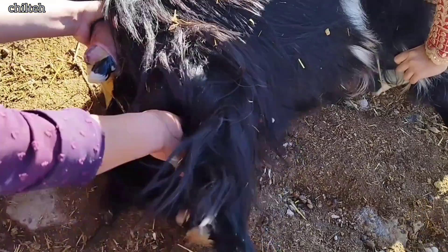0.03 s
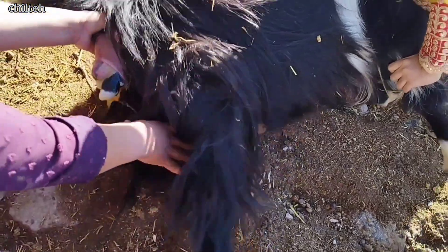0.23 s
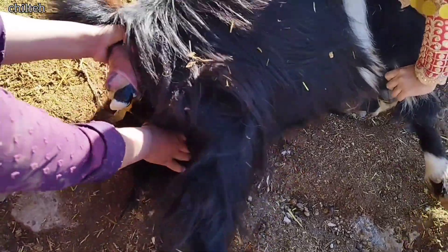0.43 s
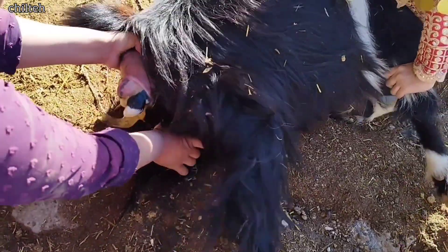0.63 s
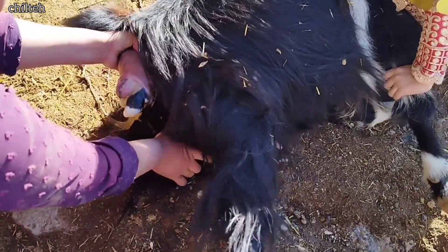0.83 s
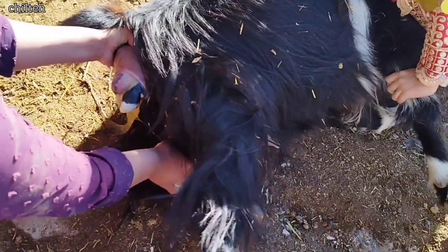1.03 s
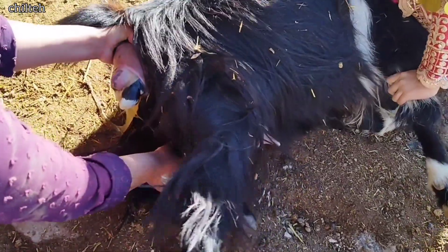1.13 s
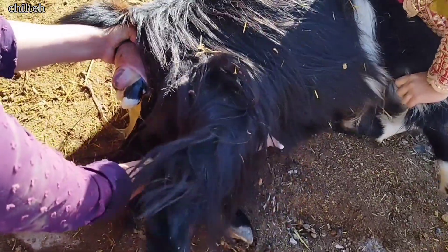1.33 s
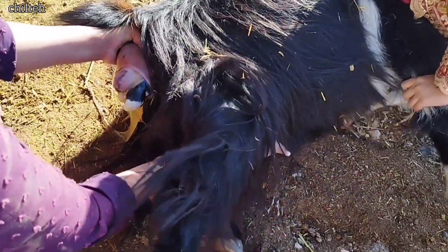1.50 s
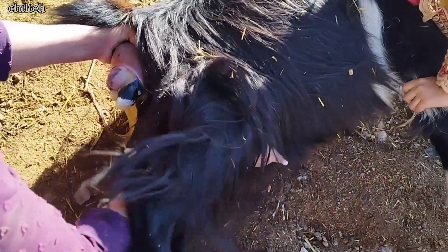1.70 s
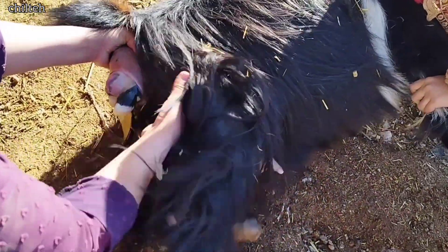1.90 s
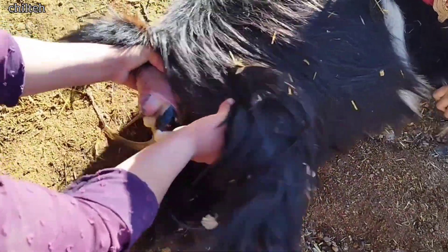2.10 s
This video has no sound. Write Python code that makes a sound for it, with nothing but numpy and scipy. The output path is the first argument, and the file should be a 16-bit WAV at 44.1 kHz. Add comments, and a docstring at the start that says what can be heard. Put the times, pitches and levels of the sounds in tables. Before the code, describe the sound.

A goat groans with its mouth shut, then gives one loud, harsh bleat close by. It trails off in a thin whine and a faint wheeze, while hands softly bump and brush its coat over a low farmyard rumble.

```python
"""Over a low farmyard rumble, hands bump and brush the coat of a goat that is being held down.
It hums, then groans with its mouth shut, which muffles the slow, ragged pulses of its vocal folds.
The jaw opens into one loud, harsh bleat: faster pulses excite the mouth resonance and a ringing rasp.
The bleat trails off in a thin whine, then a faint wheeze of breath with a falling whistle,
while the hands brush and bump again."""
import sys
import numpy as np
from scipy import signal
from scipy.fft import rfft, irfft, next_fast_len
from scipy.io import wavfile
from scipy.ndimage import uniform_filter1d, map_coordinates

SR = 44100
rng = np.random.default_rng(int(sys.argv[2]) if len(sys.argv) > 2 else 0)


def digitize_waveform(pressure):
    """Quantize a signal to 16-bit integers and store it at the path in sys.argv[1].

    Rows of a 2-D input are taken as channels; values are limited to [-1, 1].
    """
    field = np.atleast_2d(pressure).T
    bounded = np.clip(field, -1, 1)
    quanta = np.round(bounded * 32767).astype(np.int16)
    wavfile.write(sys.argv[1], SR, quanta)


N = 94815
TIME_S = np.arange(N) / SR


def amp(db):
    """Decibels to amplitude ratio."""
    return 10 ** (np.asarray(db) / 20)


def unit(x):
    """Normalisation to rms 1."""
    return x / np.sqrt(np.mean(x ** 2) + 1e-20)


def along(points, hz):
    """Interpolation on a logarithmic frequency axis."""
    freqs, values = np.transpose(points)
    return np.interp(np.log(hz + 1), np.log(freqs + 1), values)


def curve(rows, column=1):
    """Linear interpolation of a column over time."""
    rows = np.asarray(rows)
    return np.interp(TIME_S, rows[:, 0], rows[:, column])


def envelope(rows, column=1):
    """Gain from a decibel column, with exponential decay outside the table."""
    outside_s = np.maximum(rows[0][0] - TIME_S, 0) + np.maximum(TIME_S - rows[-1][0], 0)
    return amp(curve(rows, column) - 700 * outside_s)


def wobble(rate_hz):
    """Smooth random modulation: a spline through rate_hz knots a second."""
    return map_coordinates(rng.standard_normal(4096), [TIME_S * rate_hz], mode="wrap")


def phase_of(hz):
    """Phase in radians as the integral of frequency."""
    return 2 * np.pi * np.cumsum(hz) / SR


def filtered(x, response):
    """Linear filtering: the spectrum times a frequency response."""
    size = next_fast_len(N + SR // 2)
    return irfft(rfft(x, size) * response(np.fft.rfftfreq(size, 1 / SR)), size)[..., :N]


def coloured(x, spectrum):
    """Minimum-phase filtering by (freq_hz, gain_db) points, at rms 1."""
    def response(hz):
        cepstrum = irfft(np.log(np.maximum(amp(along(spectrum, hz)), 1e-6)))
        half = len(cepstrum) // 2
        cepstrum[1:half] *= 2
        cepstrum[half + 1:] = 0
        return np.exp(rfft(cepstrum))
    return unit(filtered(x, response))


def noise(spectrum):
    """Spectrally shaped Gaussian noise at rms 1."""
    return coloured(rng.standard_normal(N), spectrum)


# Spectra of the outdoor rumble and the distant hiss: freq_hz, gain_db
RUMBLE_SPECTRUM = [(12, -32.5), (20, 1), (58, -4.5), (81, -12.5), (134, -11), (189, -21.5), (229, -23.5),
                   (323, -26), (475, -30.5), (512, -34), (568, -27), (700, -36.5), (910, -67), (1540, -120)]
HISS_SPECTRUM = [(290, -40.5), (500, -18), (537, -5), (648, -22.5), (676, -5), (927, -8), (1750, -5.5),
                 (2430, -11.5), (2840, -16), (15500, -27.5)]
RUMBLE_DB, HISS_DB = -47, -65


def yard():
    """Ambient noise: a low rumble and a far hiss, each wavering slightly in level."""
    rumble = amp(RUMBLE_DB + 2.1 * wobble(10.21)) * noise(RUMBLE_SPECTRUM)
    hiss = amp(HISS_DB + 0.63 * wobble(2.7)) * noise(HISS_SPECTRUM)
    return rumble + hiss


# Impacts of hands and hooves: start_s, level_db, t60_s
BUMPS = [(.055, -45.5, 0.093), (0.063, -53, 0.028), (1.718, -46, 0.13), (1.966, -60.5, .15)]
# Spectrum of an impact: freq_hz, gain_db
BUMP_SPECTRUM = [(80, 0), (200, 12), (550, 7), (900, -2), (1600, -7.5), (3000, -24), (10000, -34),
                 (15000, -47)]
# Strokes over the coat: peak_s, half_width_s, level_db, centre_hz
BRUSHES = [(0.22, 0.027, -60.5, 2700), (1.157, 0.0085, -64, 7000), (1.85, 0.087, -70.5, 8600)]
# Spectrum of a stroke: ratio_to_centre, gain_db
BRUSH_SPECTRUM = [(.2, -22), (.7, -1), (1.2, -1), (1.9, -20)]


def handling():
    """Damped impacts give dull bumps; friction on hair gives brief swells of band noise."""
    out = np.zeros(N)
    for start_s, level_db, t60_s in BUMPS:
        decay_db = 60 * np.maximum(TIME_S - start_s, 0) / t60_s
        out += (TIME_S >= start_s) * amp(level_db - decay_db) * noise(BUMP_SPECTRUM)
    for peak_s, half_width_s, level_db, centre_hz in BRUSHES:
        band = [(centre_hz * ratio, gain_db) for ratio, gain_db in BRUSH_SPECTRUM]
        hairs = noise(band) * amp(1.5 * wobble(290))
        out += amp(level_db) * np.exp(-((TIME_S - peak_s) / half_width_s) ** 2) * hairs
    return out


# Low note before the groan: time_s, pitch_hz, level_db
HUM = [(.055, 140, -53), (.072, 150, -43.5), (.09, 152, -57.5), (.135, 150, -46), (.17, 140, -45),
       (.2, 135, -47)]


def hum():
    """A soft pure tone under random frequency modulation."""
    pitch_hz = curve(HUM) * (1 + .05 * wobble(61))
    return envelope(HUM, column=2) * unit(np.sin(phase_of(pitch_hz)))


def vocal_folds(pitch_hz, jitter, shimmer_db, alternation):
    """Glottal source: pulses uneven in period (jitter) and size (shimmer), each with a puff of air."""
    cycles = np.cumsum(pitch_hz * np.exp(jitter * wobble(170))) / SR
    count = np.arange(1, int(cycles[-1]))
    centres = np.interp(count, cycles, np.arange(N))
    strong_weak = 1 + alternation * (-1) ** count
    sizes = amp(shimmer_db * rng.uniform(-1.64, 1.36, 2048)[count]) * strong_weak
    taps = centres.astype(int)[:, None] + np.arange(-7, 9)
    offsets = taps - centres[:, None]
    shapes = sizes[:, None] * np.sinc(offsets) * np.cos(np.pi * offsets / 16) ** 2  # band-limited
    pulses = np.bincount(np.clip(taps, 0, N - 1).ravel(), shapes.ravel(), N)
    puffs = rng.standard_normal(N) * (0.22 + np.exp(-4 * (cycles % 1)))
    return unit(pulses - pulses.mean()), unit(puffs)


def blend(source, air, air_share):
    """Equal-power mixing of two uncorrelated signals."""
    return np.sqrt(1 - air_share) * source + np.sqrt(air_share) * air


def steady(x):
    """Division by the running rms evens out slow drifts and keeps fast roughness."""
    power = uniform_filter1d(uniform_filter1d(x ** 2, size=800), size=800)
    return x / np.sqrt(np.abs(power) + 1e-9)


# Envelope of the groan: time_s, level_db
GROAN_LEVEL = [(.14, -57), (.178, -38.5), (.2, -31.5), (.228, -26), (.25, -30.5), (.275, -28), (.298, -26),
               (.318, -26), (.34, -24), (.37, -50), (.41, -77)]
# Spectrum behind the closed mouth: freq_hz, gain_db
GROAN_SPECTRUM = [(47, -39), (80, -11.5), (113, -10.5), (146, -5), (247, -0.5), (380, -10), (414, -3.5),
                  (516, -10.5), (651, -21), (755, -24.5), (930, -41.5), (1030, -34), (1500, -58.5),
                  (1950, -56.5), (3300, -120)]


def groan():
    """Low-pass filtering: the closed mouth muffles slow, ragged glottal pulses."""
    pulses, puffs = vocal_folds(np.full(N, 117.94), jitter=0.11, shimmer_db=2.5, alternation=.1)
    source = blend(pulses, puffs, air_share=0.34)
    return envelope(GROAN_LEVEL) * steady(coloured(source, GROAN_SPECTRUM))


# Mouth resonance, rising as the jaw opens: time_s, centre_hz
FORMANT = [(.35, 546), (.39, 638.4), (.43, 664), (.46, 762), (.55, 821), (.65, 766), (.72, 806), (.77, 747),
           (.81, 686), (.86, 790)]
# Stationary skirt below that resonance: freq_hz, gain_db
SKIRT_SPECTRUM = [(250, -34.5), (380, -17.5), (450, -3.5), (540, -5.5), (600, 8), (680, -7.5), (900, -10.5),
                  (1500, -53)]
FORMANT_WIDTH_HZ, SKIRT_DB = 150, -11.5


def open_mouth(source):
    """A moving formant: the mouth cavity acts as a double-pole resonator."""
    carrier = np.exp(1j * phase_of(curve(FORMANT)))
    pole = np.exp(-np.pi * FORMANT_WIDTH_HZ / SR)
    baseband = signal.lfilter([1], np.poly([pole, pole]), source / carrier)
    return unit((carrier * baseband).real) + amp(SKIRT_DB) * coloured(source, SKIRT_SPECTRUM)


# Steady narrow peaks that colour the rasp, from nearby reflections: centre_hz, width_hz, gain_db
RASP_PEAKS = [(1062, 16, 3.5), (1502, 77, -7.5), (1775, 25, -0.5), (1829, 75, -1), (1957, 110, -7),
              (2167, 25, 0.5), (2323, 33, -4), (2480, 22, 2.5), (2490, 63, -4.5), (2666, 10, -2),
              (2992, 15, -6), (3527, 29, -12.5), (3713, 54, -20), (4740, 160, -21)]
# Broad part of the rasp: freq_hz, gain_db
SNARL_SPECTRUM = [(800, -28.5), (1150, 2), (1400, -1), (1900, 2), (2600, -1.5), (3300, -0.5), (4000, -20.5),
                  (5000, -21), (6500, -37)]
SNARL_DB = -5


def rasp_colour(source):
    """Colouration by early reflections: narrow peaks of alternating sign, added to a broad snarl."""
    def peaks(hz):
        return sum((-1) ** k * amp(db) * 1j * hz * width / (centre ** 2 - hz ** 2 + 1j * hz * width)
                   for k, (centre, width, db) in enumerate(RASP_PEAKS))
    return unit(filtered(source, peaks)) + amp(SNARL_DB) * coloured(source, SNARL_SPECTRUM)


# Vibration rate of the folds: time_s, pitch_hz
BLEAT_PITCH = [(.335, 226.2), (.36, 213.5), (.385, 219.8), (.42, 259.1), (.47, 277.9), (.57, 280.3),
               (.61, 267.8), (.64, 280), (.68, 270.2), (.725, 281.7), (.76, 261.5), (.785, 273.4),
               (.82, 246.2), (.87, 213.1)]
# Band envelopes before their trims: time_s, chest_db, mouth_db, rasp_db, upper_rasp_db, treble_db
BLEAT_LEVELS = [(.342, -32.5, -50, -60, -67.5, -74), (.362, -19.5, -32.5, -46, -62.5, -58.5),
                (.378, -21, -23, -40, -55.5, -62.5), (.386, -19.5, -22.5, -45, -55, -58.5),
                (.415, -24, -21.5, -33, -46, -53.5), (.455, -23, -19.5, -27.5, -46, -52),
                (.49, -25.5, -20, -26.5, -41, -51), (.555, -27, -18.5, -25, -40.5, -52.5),
                (.605, -22, -15.5, -27, -45, -52.5), (.635, -25, -18, -25, -44.5, -50),
                (.682, -29, -17, -25.5, -46, -49.5), (.704, -24, -22, -25.5, -38, -48.5),
                (.735, -26.5, -19.5, -24, -43.5, -50.5), (.757, -26.5, -19.5, -34, -44, -53),
                (.78, -26, -20, -25.5, -35.5, -45), (.82, -30, -21, -30, -39, -44.5),
                (.862, -49.5, -31, -41, -51.5, -57.5), (.9, -55, -38, -51, -55.5, -75)]
# Breath in the mouth tone and in the rasp: time_s, power_share
MOUTH_AIR = [(.38, 0.11), (.47, 0.6), (.66, 0.37), (.8, 0.47)]
RASP_AIR = [(.4, .25), (.55, 0.27), (.68, .1), (.75, .3), (.8, .65)]
# Spectra of the band around the fundamental and of the treble hiss: freq_hz, gain_db
CHEST_SPECTRUM = [(60, -58), (105, -30), (135, 1), (175, -5.5), (240, 6), (320, 0.5), (380, -13),
                  (450, -29.5), (600, -46.5), (1200, -78)]
TREBLE_SPECTRUM = [(2500, -42), (4000, 2), (4500, 0.5), (5900, -10), (6800, -9.5), (9500, -13.5),
                   (12000, -21), (14000, -27.5), (15500, -49)]
QUAVER_HZ, QUAVER_DEPTH = 20.86, .04  # frequency modulation
FLUTTER_HZ, FLUTTER_DB = 54.7, 1.5  # amplitude modulation
FADE_START_S, FADE_DB_PER_S = .85, 203.5  # the mouth tone gives way to the whine


def bleat():
    """Source-filter voicing: strained, quavering folds drive the fundamental, mouth tone and rasp."""
    quaver = 1 + QUAVER_DEPTH * np.sin(2 * np.pi * QUAVER_HZ * TIME_S + 1.5 * wobble(30))
    pitch_hz = curve(BLEAT_PITCH) * quaver
    pulses, puffs = vocal_folds(pitch_hz, jitter=.045, shimmer_db=4, alternation=0.069)
    flutter = amp(FLUTTER_DB * np.sin(phase_of(FLUTTER_HZ * (1 + 0.072 * wobble(27)))))
    chest = coloured(flutter * blend(pulses, puffs, air_share=.08), CHEST_SPECTRUM)
    mouth = open_mouth(flutter * blend(pulses, puffs, curve(MOUTH_AIR)))
    harsh = rasp_colour(flutter * blend(pulses, puffs, curve(RASP_AIR)))
    rasp = coloured(harsh, [(400, -14.5), (950, -0.5), (1300, 16.5), (1950, 0), (2750, -1), (3300, -11)])
    upper_rasp = coloured(harsh, [(1000, -65.5), (2500, -13.5), (2950, 1), (3250, -3.5),
                                  (3700, 4.5), (4000, -1), (4700, -8), (6500, -19.5)])
    breath = blend(flutter * puffs, rng.standard_normal(N), air_share=0.67)
    treble = coloured(breath, TREBLE_SPECTRUM)
    fade_db = FADE_DB_PER_S * np.maximum(TIME_S - FADE_START_S, 0)
    bands = [(chest, 1), (mouth, -fade_db), (rasp, -1.5), (upper_rasp, 2.5), (treble, 1)]
    return sum(amp(trim_db) * envelope(BLEAT_LEVELS, column) * steady(band)
               for column, (band, trim_db) in enumerate(bands, 1))


# Falling note after the bleat: time_s, pitch_hz, level_db
WHINE = [(.835, 397.8, -45), (.865, 400.2, -33), (.9, 385.4, -32.5), (.918, 364.8, -45), (.935, 342, -47.5),
         (.955, 329.7, -39.5), (.99, 335.6, -45.5), (1.008, 301.2, -49), (1.04, 318.8, -44),
         (1.062, 301.7, -39), (1.08, 301.3, -67), (1.13, 290.5, -60)]
# Its partials: harmonic_number, gain_db
WHINE_HARMONICS = [(1, -13.5), (2, 2.5), (3, -16), (4, -17.5), (5, -15.5), (6, -36), (7, -25), (8, -20.5)]
# Its breath noise: time_s, level_db
WHINE_AIR = [(.86, -46.5), (.91, -45), (.96, -47), (1.05, -55.5), (1.12, -66)]


def whine():
    """A harmonic series led by its second partial; modulation at half the pitch adds a slight rattle."""
    phase = phase_of(curve(WHINE) * (1 + .014 * wobble(200)))
    note = unit(sum(amp(db) * np.sin(k * phase) for k, db in WHINE_HARMONICS))
    rattle = 1 + 0.18 * np.sin(phase / 2 + wobble(66))
    air = noise([(200, -15.5), (550, -13), (800, 6), (1150, -16),
                 (1600, -10), (2800, -22.5), (5000, -33.5)])
    return envelope(WHINE, column=2) * note * rattle + envelope(WHINE_AIR) * air


# Envelope of the breath: time_s, level_db
WHEEZE_LEVEL = [(.86, -62.5), (.96, -61), (1.02, -56), (1.15, -61), (1.29, -65), (1.42, -64), (1.68, -65.5),
                (1.84, -68), (1.93, -70.5), (2.0, -75)]
# Spectrum of the breath: freq_hz, gain_db
WHEEZE_SPECTRUM = [(530, -56.5), (900, 8), (943, -30), (1020, 5), (1140, -23.5), (1680, 1), (2790, -3),
                   (3650, 0), (4010, 3), (4730, -4.5), (7230, -15), (8130, -9), (9150, -14.5), (15000, -33)]
# Whistle within it: time_s, pitch_hz, level_db
WHISTLE = [(1.18, 5550, -76), (1.21, 5480, -69), (1.3, 5120, -69), (1.38, 5050, -68), (1.5, 4880, -67),
           (1.57, 4620, -69), (1.65, 4770, -66), (1.69, 4660, -65), (1.73, 4330, -66), (1.78, 4120, -68),
           (1.85, 3950, -80), (1.89, 4080, -69), (1.92, 4230, -67), (1.96, 3700, -74)]


def wheeze():
    """Breath noise and a thin, falling pure tone, both under random amplitude modulation."""
    phase = phase_of(curve(WHISTLE) * (1 + .005 * wobble(450)))
    whistle = envelope(WHISTLE, column=2) * unit(np.sin(phase) * amp(1.33 * wobble(59.85)))
    hiss = envelope(WHEEZE_LEVEL) * amp(wobble(26.52)) * noise(WHEEZE_SPECTRUM)
    return whistle + hiss


def scatter(x, t60_s):
    """All-pass scattering: nearby surfaces scramble the phase and keep the colour and level."""
    t = np.arange(SR // 2) / SR
    tail = rng.standard_normal(len(t)) * amp(-60 * t / t60_s)
    size = next_fast_len(N + SR // 2)
    all_pass = np.exp(1j * np.angle(rfft(tail, size)))
    return irfft(rfft(x, size) * all_pass, size)[:N]


def wall_echo(x, t60_s, gain_db):
    """Reverberation: the yard walls return a faint, dull tail, different on each side."""
    t = np.arange(SR // 2) / SR
    build_up = 1 - np.exp(-t / .015)
    tail = rng.standard_normal((2, len(t))) * amp(-60 * t / t60_s) * build_up
    wet = signal.fftconvolve(x[None], tail / np.linalg.norm(tail[0]), axes=1)[:, :N]
    wall_spectrum = [(250, -5.5), (800, 0), (2000, -4.5), (9000, -7.5)]
    return amp(gain_db) * filtered(wet, lambda hz: amp(along(wall_spectrum, hz)))


# Stereo width: freq_hz, side_over_mid_db
WIDTH = [(25, -12.5), (60, -6.5), (120, -11.5), (250, -17.5), (450, -8), (780, -8.5), (1250, 1.5),
         (2400, -1), (4400, -0.5), (12000, 0)]
# Stereo balance: freq_hz, left_over_right_db
BALANCE = [(200, 0.5), (750, -1.5), (1400, -0.5), (2400, -2.5), (3600, -7.5), (5000, -8), (12000, 2)]


def scene():
    """Mid-side stereo: the head is off to one side, so the treble is scattered and leans right."""
    goat = groan() + hum() + bleat() + whine()
    mid = goat + wheeze() + handling() + yard()
    diffuse = scatter(goat, t60_s=.075) + wheeze() + handling() + yard()  # fresh noise gives width
    side = filtered(diffuse, lambda hz: amp(along(WIDTH, hz)))
    pair = np.array([mid + side, mid - side])
    panned = filtered(pair, lambda hz: amp(np.outer([.5, -.5], along(BALANCE, hz))))
    return panned + wall_echo(goat, t60_s=0.15, gain_db=-14)


CUTOFF_HZ = 15700


def record(dry):
    """Band limiting by an ideal low-pass filter."""
    return filtered(dry, lambda hz: hz < CUTOFF_HZ)


dry = scene()
out = record(dry)
digitize_waveform(out)
```